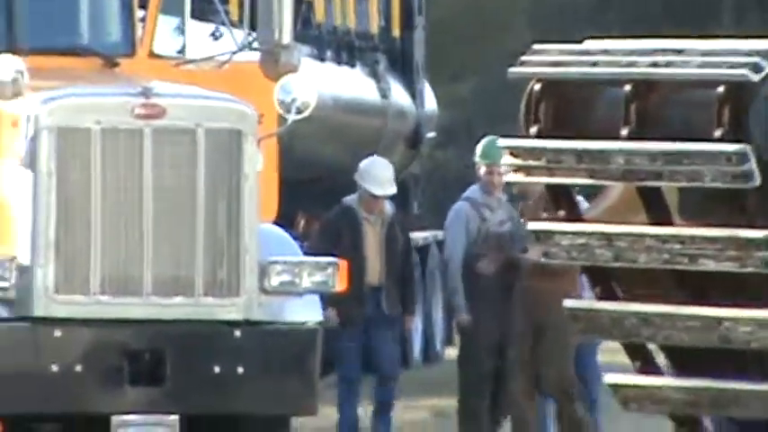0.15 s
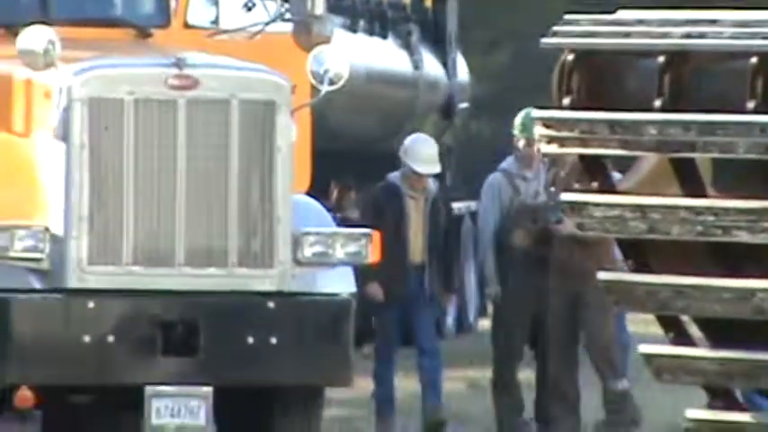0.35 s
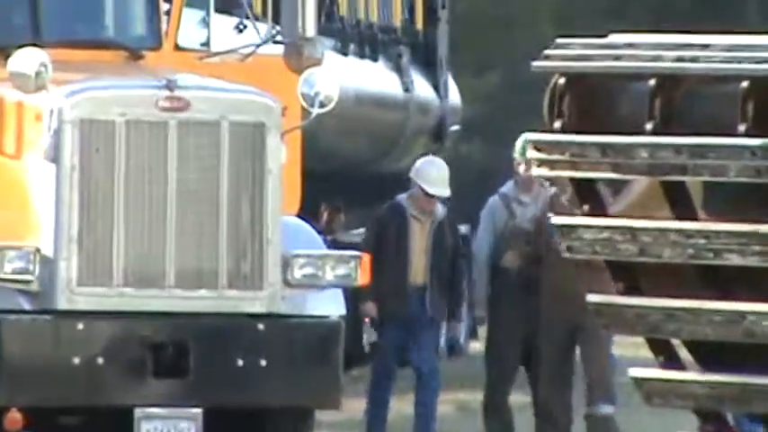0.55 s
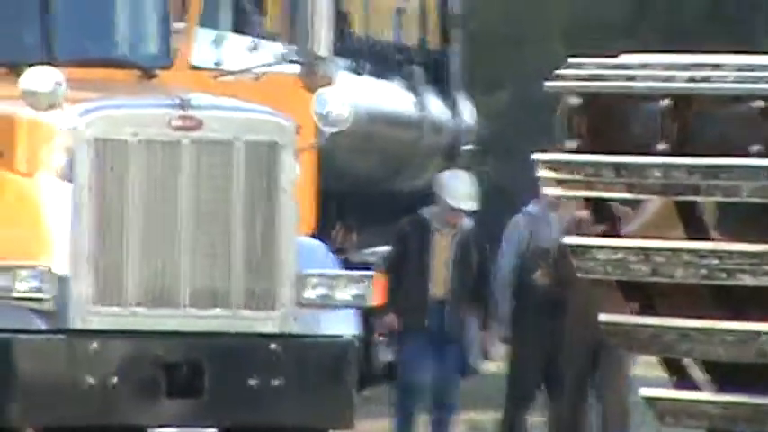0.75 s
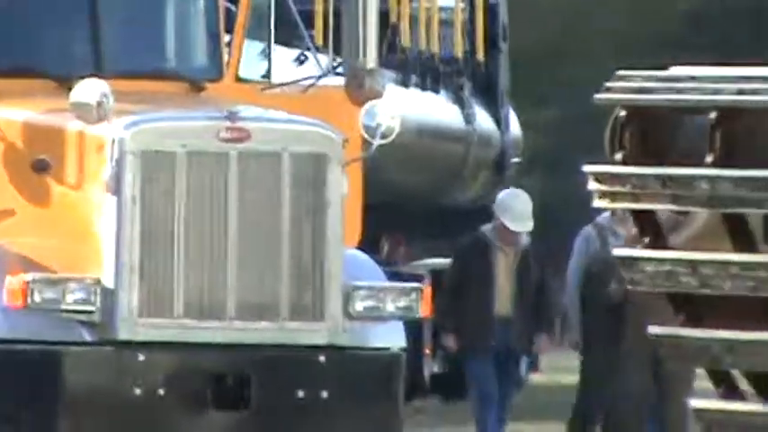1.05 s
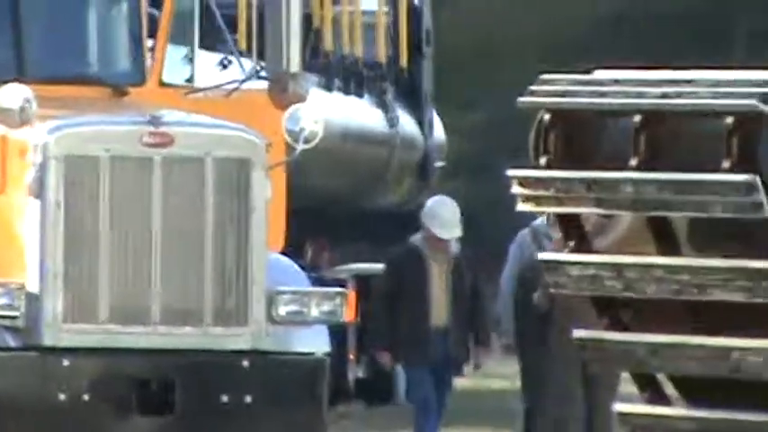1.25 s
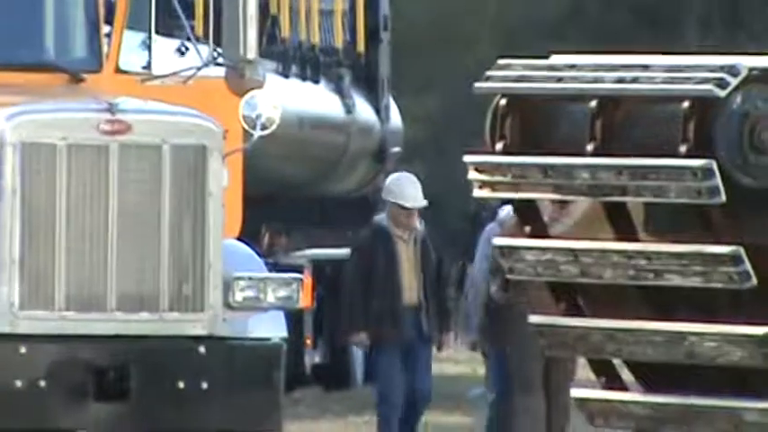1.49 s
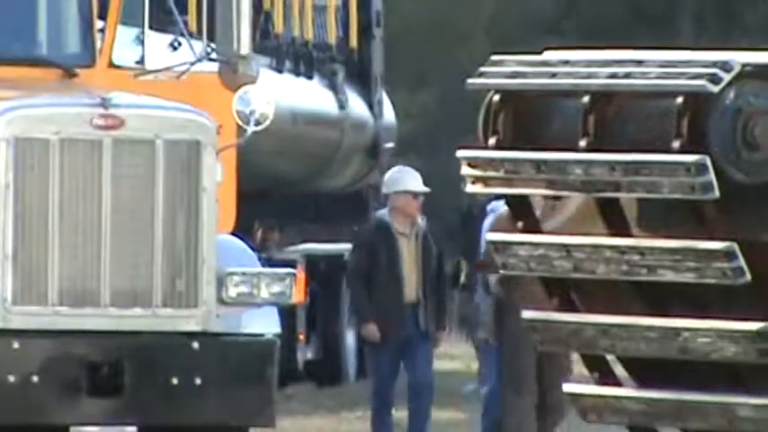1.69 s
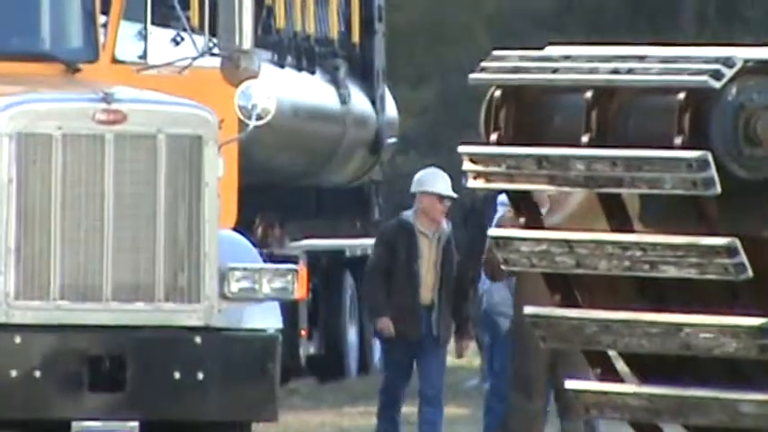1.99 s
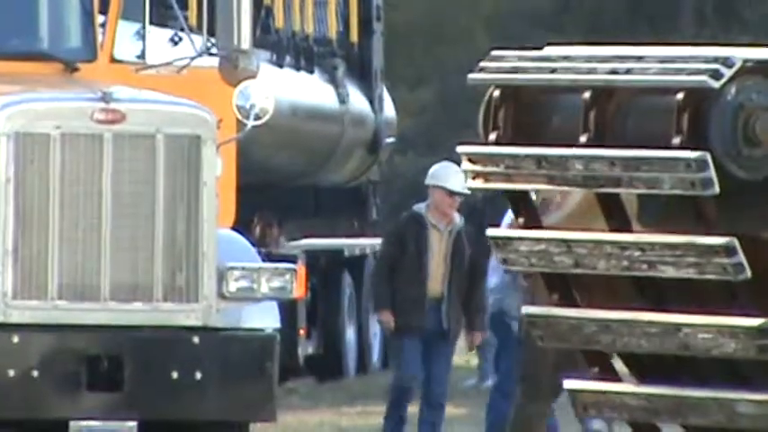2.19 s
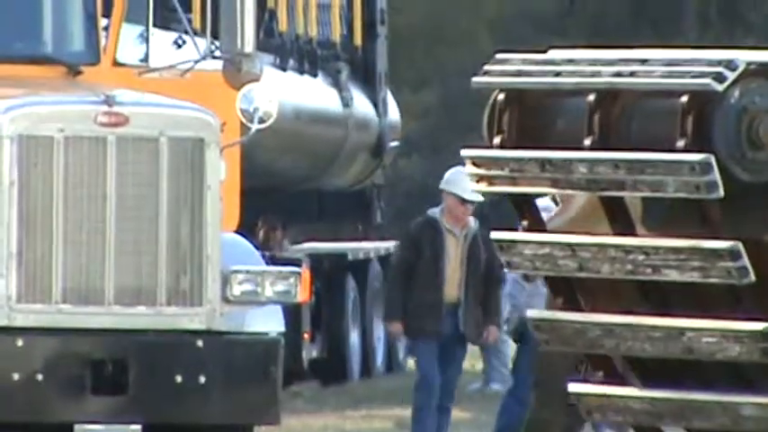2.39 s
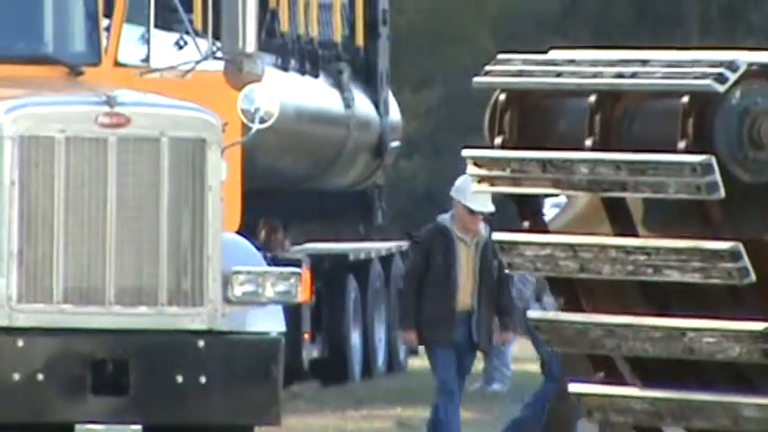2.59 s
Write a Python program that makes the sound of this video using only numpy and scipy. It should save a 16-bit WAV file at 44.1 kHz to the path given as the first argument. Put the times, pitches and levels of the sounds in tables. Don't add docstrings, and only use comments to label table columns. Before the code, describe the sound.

A heavy diesel truck idles in an open yard, its deep steady boom dominating over low exhaust rumble, soft fan roar and faint machine whine; a very faint air hiss passes early. Dry outdoor stereo pickup.

```python
import sys
import numpy as np
from scipy import signal
from scipy.io import wavfile

SR = 44100
rng = np.random.default_rng(int(sys.argv[2]) if len(sys.argv) > 2 else 0)


def convert_level_to_amplitude(level_db):
    exponent = np.asarray(level_db, float) / 20
    return 10 ** exponent


def file_out(sig):
    cols = np.atleast_2d(sig).T
    lim = np.clip(cols, -1, 1)
    pcm = np.round(lim * 32767).astype(np.int16)
    wavfile.write(sys.argv[1], SR, pcm)


N = 120834
BOOM_ORDER = 11
FIRING_LAG = .36

# time in seconds, pitch in Hz.
BOOM_PITCH = [(0, 79.3), (.24, 79.45), (.38, 80.3), (.75, 80.2), (.86, 79.85), (1.0, 80.05), (1.13, 79.5),
              (1.3, 80.1), (1.6, 80.05), (1.8, 79.75), (1.95, 79.96), (2.05, 80.35), (2.18, 80.1),
              (2.4, 81.0), (2.6, 81.05), (2.74, 80.3)]


def rms_one(x):
    return x / np.sqrt(np.mean(x ** 2) + 1e-20)


def at(points, x, warp=np.log):
    p = np.array(points)
    return np.interp(warp(x), warp(p[:, 0]), p[:, 1])


def drift(rate_hz):
    hop = 40
    r = np.exp(-2 * np.pi * rate_hz * hop / SR)
    slow = signal.lfilter([1], [1, -2 * r, r * r], rng.standard_normal(N // hop + 2002))[2000:]
    return np.interp(np.arange(N) / hop, np.arange(len(slow)), rms_one(slow - slow.mean()))


def resonate(x, hz, width):
    r = np.exp(-np.pi * width / SR)
    return signal.lfilter([1, 0, -1], [1, -2 * r * np.cos(2 * np.pi * hz / SR), r * r], x)


def pan(db):
    return convert_level_to_amplitude(np.array([[db / 2], [-db / 2]]))


def pair(hz, white):
    # frequency in Hz, correlation of left and right from 0 to 1.
    likeness = [(60, 0.78), (250, 1), (500, .71), (1000, 0.73), (2000, 0.98), (4000, 0.89), (8000, .72),
                (12000, 1)]
    # frequency in Hz, level of left over right in dB.
    lean_curve = [(60, -7), (160, -2.2), (300, 1.6), (600, 3.5), (1200, 3), (2500, 1.3), (6000, 0.4),
                  (12000, 0.3)]
    alike = at(likeness, hz)
    shared = np.sqrt(1 + alike) * white[0]
    opposed = np.sqrt(1 - alike) * white[1] * [[1], [-1]]
    return pan(at(lean_curve, hz)) * (shared + opposed)


def banded(spectrum, patchy_db):
    low_end, high_end = spectrum[0][0], min(spectrum[-1][0], 16000)
    edges = np.exp(np.arange(np.log(low_end), np.log(high_end) + .1, np.log(2) / 3))
    together = drift(1.4)
    white = rng.standard_normal((2, 2, N + SR // 4))
    out = 0
    for k, (low, high) in enumerate(zip(edges, edges[1:])):
        sos = signal.butter(2, [low, high], "band", fs=SR, output="sos")
        band = signal.sosfilt(sos, white[k % 2])[:, -N:]
        hz = np.sqrt(low * high)
        flicker_db = patchy_db * (.5 * together + drift(11))
        out = out + convert_level_to_amplitude(at(spectrum, hz) + flicker_db) * pair(hz, band)
    return rms_one(out)


def cycles():
    cycle_start_s = .1252
    t = np.arange(N) / SR
    turns = np.cumsum(at(BOOM_PITCH, t, np.asarray)) / SR / BOOM_ORDER
    return turns - np.interp(cycle_start_s, t, turns)


def stack(turns):
    # multiple of the cycle rate, peak in dB,
    # left over right in dB.
    stack_orders = [(5, -33.3, 2.5), (6, -49.7, 4.0), (8, -25.6, 2.3), (9, -36.5, 2.0), (10, -34.9, 2.2),
                    (11, -12.3, 1.8), (12, -44.0, 1.3), (13, -30.9, 1.2), (14, -39.0, 1.0),
                    (15, -37.5, 0.8), (16, -35.8, 2.4), (17, -44.9, 2.6), (18, -47.8, 2.3),
                    (19, -43.4, -1.9), (21, -38.5, -1.2), (22, -40.9, 2.4), (23, -43.4, 0.1),
                    (24, -28.0, -0.6), (25, -45.7, -1.1), (26, -50.3, -2.3), (27, -50.5, -1.8),
                    (36, -50.0, 0.6), (44, -44.4, 0.3)]
    # multiple of the cycle rate, peak in dB, left over right in dB.
    faint_orders = [(7, -51.5, 2.5), (20, -51.5, 3.9), (30, -52, 4.9), (35, -51, 8.9), (48, -56, -1.9)]
    level_db, tilt_db_per_order = 0.2, .055
    waver_db, waver_growth, waver_hz = .3, .035, 4.0
    rows = stack_orders + faint_orders
    top = max(row[1] for row in rows)
    left_lag_s = 0.00029
    late = np.array([turns - left_lag_s * BOOM_PITCH[0][1] / BOOM_ORDER, turns])
    out = 0
    for k, db, lean in rows:
        offset = k - BOOM_ORDER
        stray = .5 * (abs(offset) > 3)
        scatter = .07 if k < 1.5 * BOOM_ORDER else .4
        if db < -32:
            stray += scatter * rng.standard_normal()
        if abs(offset) == 1:
            stray -= .3 * offset
        waver = (waver_db + waver_growth * (top - db)) * drift(waver_hz)
        gain = convert_level_to_amplitude(db + level_db + tilt_db_per_order * offset + waver)
        out = out + gain * pan(lean) * -np.sin(2 * np.pi * (k * late + stray))
    return out


def knock(turns):
    # frequency in Hz, bandwidth in Hz, level in dB.
    panel_modes = [(473.2, 45, -55), (568, 33, -59), (635.6, 18, -63), (1764, 330, -52), (1940, 130, -66),
                   (2376, 150, -61.5), (2772, 490, -61), (4470, 520, -75), (5890, 590, -68.5),
                   (6800, 900, -71.5), (8840, 410, -84.5)]
    depth, uneven_db = .22, 1.5
    fire = 6 * turns - FIRING_LAG
    strength = convert_level_to_amplitude(uneven_db * rng.standard_normal(200))[np.floor(fire).astype(int) + 10]
    gate = 1 + depth * (2 * strength * np.sin(np.pi * fire) ** 2 - 1)
    out = 0
    for hz, width, db in panel_modes:
        blows = gate * rng.standard_normal((2, N))
        ringing = resonate(resonate(blows, hz, width), hz, width)
        out = out + convert_level_to_amplitude(db) * pair(hz, rms_one(ringing))
    return out


def machine():
    # multiple of shaft speed, peak in dB,
    # left over right in dB, waver in dB.
    shaft_orders = [(3, -38, 2.1, 1.1), (6, -45, 1.5, 1.5), (7, -49, 1.1, 2.1), (8, -49, 0.1, 2.1),
                    (9, -37, -.9, 1.1), (10.86, -46, -2.7, 1.5), (44.45, -56, 10.1, 4.1),
                    (67.5, -59, 3.8, 3.1), (82, -51, 4.1, 3.1), (108, -58, .9, 3.1),
                    (148.68, -67, 1.9, 2.1), (149.68, -61, 2.1, 2.1), (150.68, -66, 2.1, 2.1)]
    shaft_hz, level_db = 18.35, -1.3
    t = np.arange(N) / SR
    out = 0
    for k, db, lean, waver in shaft_orders:
        tone = np.sin(2 * np.pi * (k * shaft_hz * t + rng.random()))
        out = out + convert_level_to_amplitude(db + level_db + waver * drift(1.8)) * pan(lean) * tone
    return out


def exhaust_rumble():
    # frequency in Hz, density in dB per Hz.
    rumble_spectrum = [(20, -26), (40, -14), (80, -3), (120, -10.5), (175, -8.5), (230, -14.5), (400, -24),
                       (600, -42)]
    return convert_level_to_amplitude(-33) * banded(rumble_spectrum, patchy_db=.4)


def fan_roar(turns):
    # frequency in Hz, density in dB per Hz.
    roar_spectrum = [(330, 0), (600, 0), (1100, -2), (2000, -6), (3300, -13.5), (5000, -25.5), (7800, -37),
                     (15800, -48.5)]
    throb = 1 - .06 * np.cos(2 * np.pi * (6 * turns - FIRING_LAG))
    return convert_level_to_amplitude(-42.5) * throb * banded(roar_spectrum, patchy_db=1.0)


def air_valve():
    # frequency in Hz, density in dB per Hz.
    leak_spectrum = [(2200, -16), (3300, -6), (4200, 0), (5200, -4), (6500, -5), (9000, -14), (12000, -26)]
    start_s, rise_s, end_s, fall_s = .2, .17, .88, .07
    tick_s, tick_t60_s = .838, .07
    t = np.arange(N) / SR
    opening = np.clip(np.minimum((t - start_s) / rise_s, 1 - (t - end_s) / fall_s), 0, 1)
    hiss = convert_level_to_amplitude(-56) * opening * banded(leak_spectrum, patchy_db=.4)
    decay = (t > tick_s) * convert_level_to_amplitude(-60 * np.maximum(t - tick_s, 0) / tick_t60_s)
    tick = 0
    for hz in (6850, 8700, 10400):
        tick = tick + pair(hz, rms_one(resonate(rng.standard_normal((2, N)), hz, 400)))
    return hiss + convert_level_to_amplitude(-64.5) * decay * tick


def scene():
    # time in seconds, gain in dB.
    load_curve = [(0, 0.85), (1.0, 0.4), (1.7, 0.53), (2.3, 1.3), (2.74, 3)]
    turns = cycles()
    load = convert_level_to_amplitude(at(load_curve, np.arange(N) / SR, np.asarray))
    engine = stack(turns) + exhaust_rumble() + load * (fan_roar(turns) + knock(turns))
    return engine + machine() + air_valve()


def roll_off(x):
    return signal.sosfilt(signal.butter(12, 15770, fs=SR, output="sos"), x)


def record(dry):
    # frequency in Hz, density in dB per Hz.
    hiss_spectrum = [(4000, -5.5), (8000, -3), (15800, -3)]
    wet = dry + convert_level_to_amplitude(-68.5) * banded(hiss_spectrum, patchy_db=-2.1)
    return roll_off(wet)


dry = scene()
out = record(dry)
file_out(out)
```